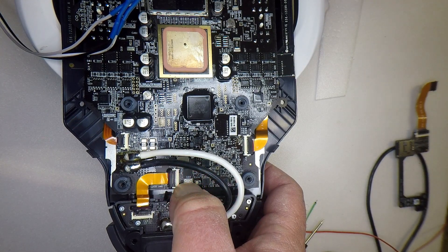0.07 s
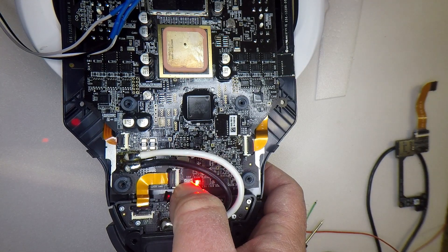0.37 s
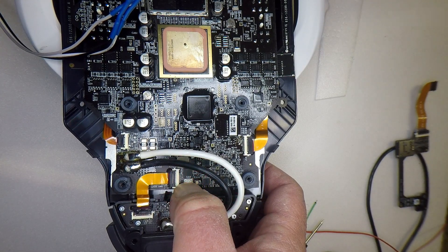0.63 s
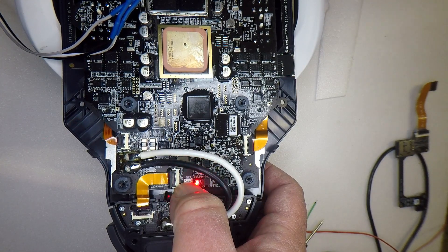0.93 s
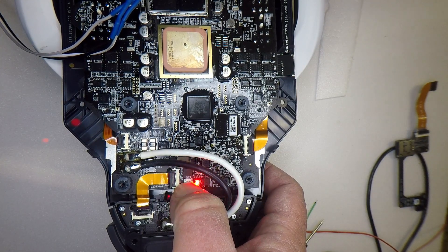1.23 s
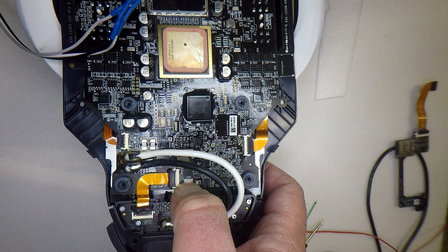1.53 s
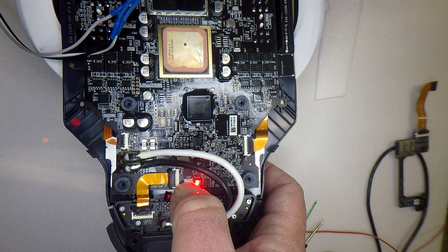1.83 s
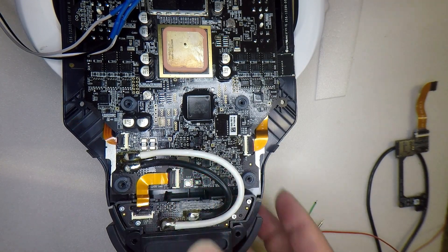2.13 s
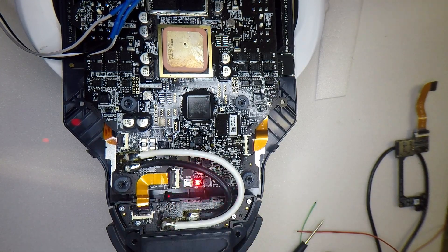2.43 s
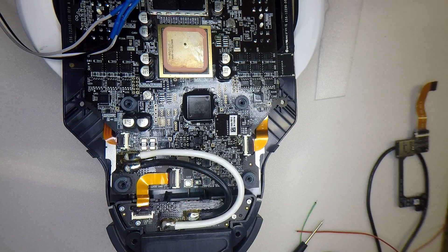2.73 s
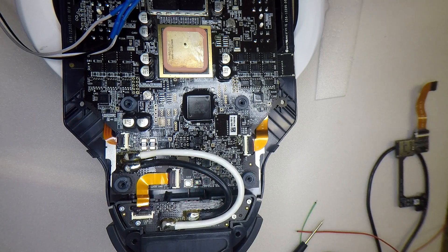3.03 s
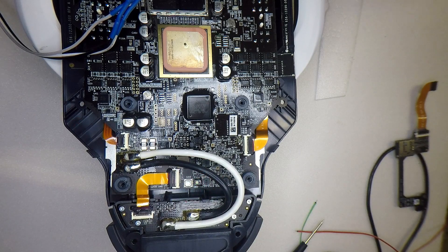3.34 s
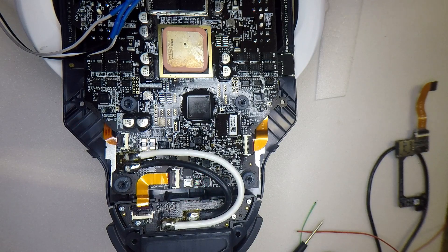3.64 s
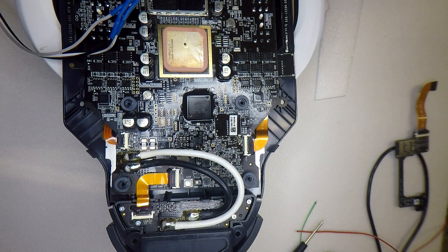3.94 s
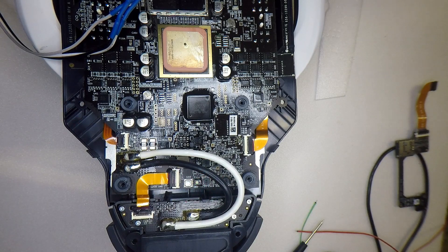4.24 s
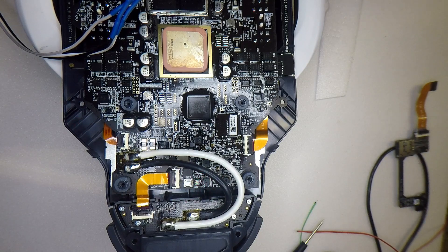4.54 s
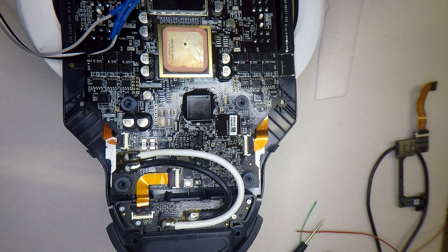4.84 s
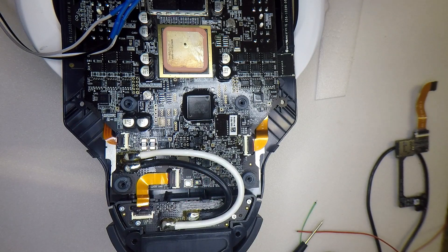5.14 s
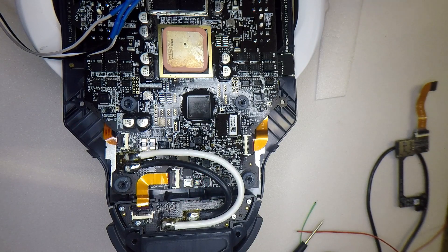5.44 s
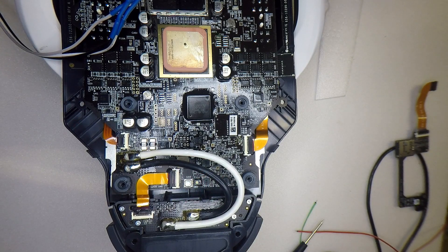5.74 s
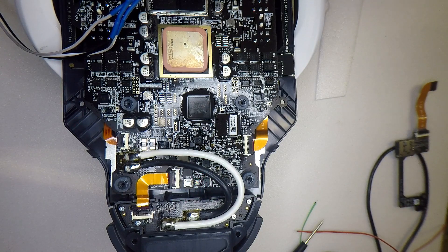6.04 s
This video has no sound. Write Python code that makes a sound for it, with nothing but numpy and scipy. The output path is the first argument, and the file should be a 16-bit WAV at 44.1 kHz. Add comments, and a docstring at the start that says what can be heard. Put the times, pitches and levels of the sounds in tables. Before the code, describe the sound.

A small cooling fan runs in an opened electronic device, a steady hum over a soft rush of air. About two seconds in, a finger creaks on the plastic, the case knocks loudly on the workbench, and the fingertip brushes off with a few light taps. A faint tick follows a second later. The fan carries on, heard close in a small room, over faint mains hum, hiss and a thin high whine.

```python
"""First you hear a small cooling fan humming and rushing in an opened device on a workbench.
A finger creaks on the plastic, lets go of a button and brushes off the circuit board. About two
seconds in, the case knocks loudly on the bench and the camera's limiter briefly turns it all down.
Underneath are a faint mains hum and the camera's own hiss and thin whine, pulsing once a frame."""
import sys
import numpy as np
from scipy import signal
from scipy.fft import rfft, irfft, next_fast_len
from scipy.io import wavfile
from scipy.ndimage import uniform_filter1d, minimum_filter1d, map_coordinates

SR = 44100
rng = np.random.default_rng(int(sys.argv[2]) if len(sys.argv) > 2 else 0)


def wav_record(signal):
    """Record a signal, one row per channel, as 16-bit PCM in the file named by sys.argv[1]."""
    frames = np.transpose(np.atleast_2d(signal))
    bounded = np.clip(frames, -1, 1)
    # unit amplitude maps onto the largest positive 16-bit level
    quanta = np.round(bounded * 32767).astype(np.int16)
    wavfile.write(sys.argv[1], SR, quanta)


N = 268613
TIME = np.arange(N) / SR
FFT_SIZE = 2 * next_fast_len(N // 2 + 4096)


# The fan's notes: multiple of its turning rate, level/dB, left minus right/dB
FAN_NOTES = [(4, -44, -4), (6, -47, -5.5), (7, -59, -2), (8, -63.5, -6), (10, -67.5, -11), (11, -72, -27),
             (12, -75, -18), (14, -62, -10)]

def fan_tones(top_speed_hz=58.9, fastest_s=3.0, flutter_db=0.7, sway_db=0.86):
    """The spinning fan hums at multiples of its speed; swirling air makes each note flutter."""
    speed_hz = top_speed_hz - 0.03507 * (TIME - fastest_s) ** 2
    turns = np.cumsum(speed_hz + 0.024 * wobble(5.23)) / SR
    out = np.zeros((2, N))
    for multiple, db, balance_db in FAN_NOTES:
        level_db = db + flutter_db * wobble(12) + sway_db * wobble(2.03)
        tone = np.sqrt(2) * np.sin(2 * np.pi * (multiple * turns + rng.random()))
        out += pan(balance_db) * amp(level_db) * tone
    return out


# How strong the rushing air is, from low to high: f/Hz, level/dB
AIR_COLOUR = [(30, 9.5), (75, -9), (115, -1.5), (155, 3), (200, -3.3), (300, -2), (400, -6.5), (550, -8),
              (800, -11), (930, -13), (1500, -22.5), (2050, -25.5), (2800, -34.5), (5000, -43),
              (15000, -56)]
# The air at the two microphones: f/Hz, left minus right/dB, how alike they sound (0 to 1)
AIR_STEREO = [(70, 0, 0.2), (164, -3, 0.93), (312, -4.5, 0.95), (534, -8.5, 0.5), (676, -8.5, 0.88),
              (1080, -0.5, 0.84), (1790, 2, 0.37), (2740, 2.5, 1), (4000, 5.5, 0.77)]
# How far the right microphone lags the left: f/Hz, lag/radians
RIGHT_LAG = [(520, 0), (720, 1.4), (1050, 2.5), (1700, 2.4), (2700, 1.4), (4000, .3)]

def fan_rush(start_db=-38, ease_db_per_s=0.35, swell_db=0.5):
    """Air tumbles through the fan, slowly getting quieter; the two microphones share part of it."""
    hz, (shared, own) = white_spectra()
    balance_db, alike = along(AIR_STEREO, hz)
    lag = np.exp(-1j * along(RIGHT_LAG, hz)[0])
    right = (alike * shared + np.sqrt(1 - alike ** 2) * own) * lag
    spectrum = np.array([shared, right]) * pan(balance_db) * amp(along(AIR_COLOUR, hz)[0])
    air = unit(irfft(spectrum)[:, :N])
    return air * amp(start_db - ease_db_per_s * TIME + swell_db * wobble(7.3))


# The notes the case rings with: f/Hz, level/dB, time to fade by 60 dB/s
CASE_NOTES = [(164, -12.5, 0.18), (220, 14, 0.02), (218, -14.5, 0.35), (307, -25, 0.13), (368, 3, 0.019),
              (453, -4.5, 0.031), (560, -10, 0.071), (700, -0.5, 0.018), (850, -7, 0.028),
              (1023, -0.5, 0.021), (1270, -6, 0.018), (1886, -11.5, 0.052)]
# Each knock: t/s, level/dB, centre f/Hz, hand damping (higher fades faster), left minus right/dB
KNOCKS = [(.186, -25, 180, 0.9, -2), (1.811, -26.5, 700, 1.1, -3), (1.823, -26, 280, 0.35, -1),
          (1.9195, 7.5, 400, 0.88, -0.5), (1.9369, -3.5, 160, 1, -3), (2.010, -16.5, 278, 1.1, -2),
          (2.0235, -22.5, 680, 0.97, -1), (2.0308, -12.5, 235, 0.98, -3), (2.047, -20, 150, 0.9, -3),
          (2.067, -27.5, 228, 0.58, -2), (2.9079, -21, 1050, .95, -3), (2.9208, -28, 180, 1.4, 0)]

def knocks(spread=1.91, snap_db=-36, scatter_db=0.7):
    """The case hits the bench with a tiny snap and rings; a stiffer hit brings out higher notes."""
    t = np.arange(SR // 2) / SR
    out = np.zeros((2, N + len(t)))
    for start_s, db, centre_hz, damping, balance_db in KNOCKS:
        ring = np.zeros(len(t))
        for hz, note_db, fade_s in CASE_NOTES:
            fading_db = note_db - scatter_db * rng.standard_normal() - 60 * damping * t / fade_s
            ring += amp(fading_db) * np.sin(2 * np.pi * hz * t)
        band = signal.butter(2, [centre_hz / spread, centre_hz * spread], "band", fs=SR, output="sos")
        thud = signal.sosfilt(band, ring)
        dull_noise = signal.lfilter(*signal.butter(2, 2100, fs=SR), rng.standard_normal(len(t)))
        snap = dull_noise * amp(snap_db - 60 * t / 0.021)
        knock = thud / np.abs(thud).max() + snap
        out[:, round(start_s * SR):][:, :len(t)] += pan(balance_db) * amp(db) * knock
    return out[:, :N]


# The notes in one creak: multiple of its pitch, level/dB
PLASTIC_NOTES = [(.6, -21), (.87, -3), (1, 10), (1.17, -9.5), (1.48, -25), (2.7, -11.5)]
# Each creak: t/s, length/s, level/dB, pitch f/Hz, left minus right/dB
CREAKS = [(0.183, 0.036, -29.5, 893, -4.5), (1.799, 0.026, -17, 652, -2), (1.885, 0.012, -28.5, 800, -4),
          (2.877, 0.0099, -32.5, 640, -1), (2.904, 0.013, -27, 810, 0)]

def creaks(slip_hz=335, fade_s=0.018, droop=0.075, slips=30):
    """Skin sticks and slips, ringing the plastic; the pitch droops as the finger eases off."""
    t = np.arange(SR // 8) / SR
    out = np.zeros((2, N + len(t)))
    for start_s, length_s, db, hz, balance_db in CREAKS:
        slip_s = (np.arange(slips) + 0.4 * rng.random(slips)) / slip_hz
        progress = np.minimum(slip_s / length_s, 1)
        force = np.sin(np.pi * progress) ** 2 * amp(rng.normal(0, 2, slips))
        pitch = hz * (1 + droop * (0.5 - progress[:, None]))
        age = np.maximum(t - slip_s[:, None], 0)
        rings = sum(amp(note_db) * np.sin(2 * np.pi * pitch * multiple * age)
                    for multiple, note_db in PLASTIC_NOTES)
        rise_and_fade = (1 - np.exp(-age / 0.00062)) * amp(-60 * age / fade_s)
        creak = force @ (rings * rise_and_fade)  # add up all the slips
        creak /= np.abs(creak).max()
        out[:, round(start_s * SR):][:, :len(t)] += pan(balance_db) * amp(db) * creak
    return out[:, :N]


# Rubbing skin, heard through the case: f/Hz, level/dB
RUB_COLOUR = [(100, -5), (170, 7.5), (350, 5), (600, 1.5), (800, -4), (1200, -16), (2000, -20.5),
              (3600, -33.5), (5000, -42.5), (8500, -34), (14000, -61)]

def finger_brush(start_s=1.945, rise_s=0.083, fade_s=0.024, grain_db=0.5):
    """The fingertip's grainy rubbing swells as it speeds up and stops as it lifts."""
    hz, (noise, _) = white_spectra()
    rub = irfft(noise * amp(along(RUB_COLOUR, hz)[0]))[:N] * amp(-grain_db * wobble(310))
    fastest_s = start_s + rise_s
    touch = np.interp(TIME, [start_s - fade_s, start_s, fastest_s, fastest_s + fade_s], [0, 1, 1, 0])
    level_db = np.interp(TIME, [start_s, fastest_s], [-34.5, -30.5])
    return pan(balance_db=-3) * unit(rub) * amp(level_db) * touch


# How the camera's body tips the sound of the case to one side: f/Hz, extra left minus right/dB
BODY_SHADE = [(200, -1), (400, -3), (650, -8.5), (1100, 2.5), (3000, 2)]

def path_to_microphones(hz):
    """Left and right gains: the camera's body shades the sound, and higher notes reach the right late."""
    lag = np.exp(-1j * np.outer([0, 1], along(RIGHT_LAG, hz)[0]))
    return pan(along(BODY_SHADE, hz)[0]) * lag


def room_echo(x, fade_s=0.27):
    """The small workshop answers with a short, blurred echo."""
    t = np.arange(SR // 3) / SR
    tail = rng.standard_normal((2, len(t))) * amp(-60 * t / fade_s) * (t > 0.005)
    return signal.fftconvolve(x, tail / np.linalg.norm(tail[0]), axes=1)[:, :N]


def mains_hum(mains_hz=50, level_db=-49.5, waver_db=2.5):
    """The power supply's faint, wavering note at four times the mains frequency."""
    tone = np.sqrt(2) * np.sin(2 * np.pi * 4 * mains_hz * TIME)
    return pan(balance_db=-3) * amp(level_db + waver_db * wobble(6.4)) * tone


# How strong the microphone hiss is, from low to high: f/Hz, level/dB
HISS_COLOUR = [(1500, 6), (4500, -3), (6500, 0), (9500, 0), (12000, -8), (14800, -21)]

def camera_noise(hiss_db=-60, whine_db=-60.5, clock_db=-89, whine_hz=8541, frame_hz=29.972):
    """The camera's electronics add hiss, a whine that swells once a frame, and faint clock tones."""
    hz, noise = white_spectra()
    hiss = unit(irfft(noise * amp(along(HISS_COLOUR, hz)[0]))[:, :N])
    frame_progress = (TIME * frame_hz - 0.05) % 1
    pulse = np.interp(frame_progress, [0.72, 0.95, 1], [0, 1, 0])
    whine = pulse * np.sin(2 * np.pi * whine_hz * TIME + 0.45 * wobble(37))
    clock = sum(np.sin(2 * np.pi * f * TIME) for f in (6000, 7000, 8000))
    return pan(balance_db=-3.5) * (amp(hiss_db) * hiss + amp(whine_db) * whine + amp(clock_db) * clock)


def amp(db):
    """Turn decibels into a number to multiply by."""
    return 10 ** (np.asarray(db) / 20)


def unit(x):
    """Scale a sound to an average (rms) size of 1."""
    return x / np.sqrt(np.mean(x ** 2) + 1e-20)


def along(table, hz):
    """Read a table's columns at hz, blending between rows on a pitch scale."""
    row_hz, *columns = np.transpose(table)
    return [np.interp(np.log(hz + 1), np.log(row_hz + 1), column) for column in columns]


def pan(balance_db):
    """Left and right gains; a positive balance is louder on the left."""
    half_db = np.atleast_1d(balance_db) / 2
    return amp([half_db, -half_db])


def wobble(rate):
    """A smooth curve through rate random values a second."""
    return map_coordinates(rng.standard_normal(int(N * rate / SR) + 4), [TIME * rate])


def white_spectra():
    """Frequencies, and the spectra of two unrelated white noises."""
    return np.fft.rfftfreq(FFT_SIZE, 1 / SR), rfft(rng.standard_normal((2, FFT_SIZE)))


def filtered(x, gain_at):
    """Multiply each frequency in x by gain_at(hz)."""
    return irfft(rfft(x, FFT_SIZE) * gain_at(np.fft.rfftfreq(FFT_SIZE, 1 / SR)))[:, :N]


def scene():
    """The fan, the handling with its echo, and the hum and hiss behind them."""
    handling = filtered(knocks() + creaks() + finger_brush(), path_to_microphones)
    echo = amp(-18) * room_echo(handling)
    return fan_tones() + fan_rush() + handling + echo + mains_hum() + camera_noise()


# The camera's wind filter, which removes deep bass: f/Hz, level/dB
WIND_FILTER = [(40, -33.5), (80, -21.5), (116, -25), (134, -8), (148, 1)]

def record(dry, ceiling=0.97, recover_db_per_s=130, top_hz=14950):
    """The camera cuts the bass, briefly turns down anything too loud, then cuts the highest treble."""
    x = filtered(dry, lambda hz: amp(along(WIND_FILTER, hz)[0]))
    too_loud_db = np.maximum(0, 20 * np.log10(np.abs(x).max(axis=0) / ceiling + 1e-9))
    recovery_db = recover_db_per_s * TIME
    turn_down_db = np.maximum.accumulate(too_loud_db + recovery_db) - recovery_db
    gain = uniform_filter1d(minimum_filter1d(amp(-turn_down_db), size=221), size=221)  # smooth over 5 ms
    return filtered(x * gain, lambda hz: hz < top_hz)


dry = scene()
out = record(dry)
wav_record(out)
```